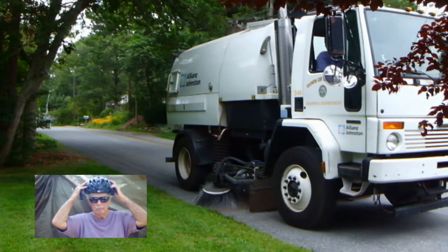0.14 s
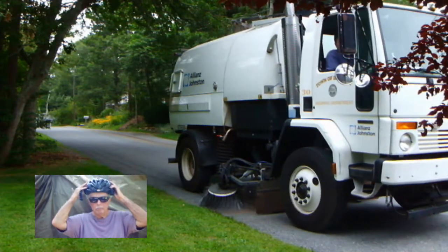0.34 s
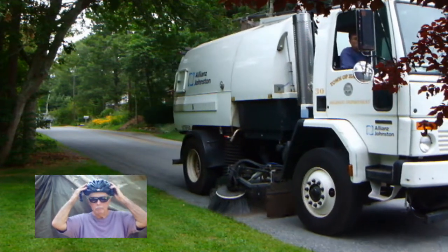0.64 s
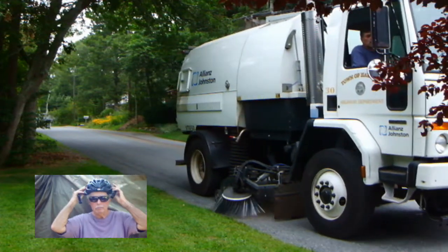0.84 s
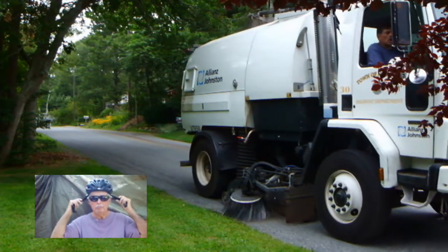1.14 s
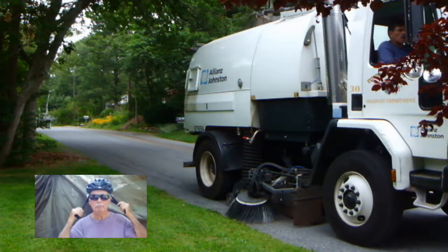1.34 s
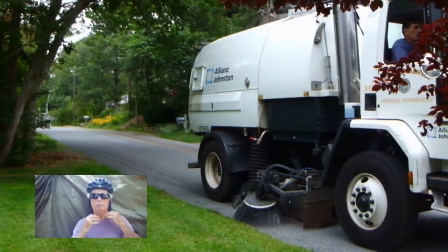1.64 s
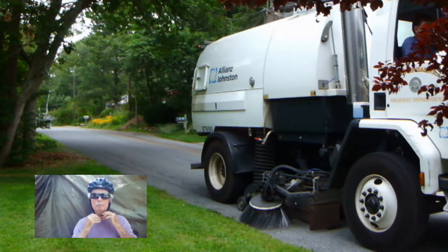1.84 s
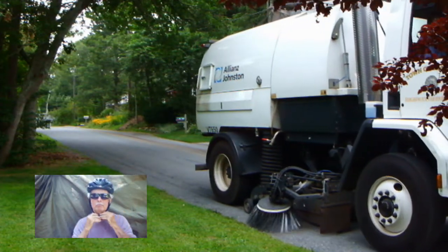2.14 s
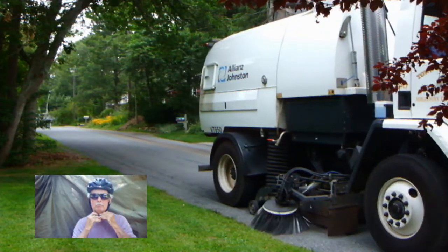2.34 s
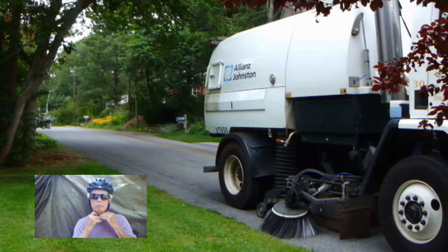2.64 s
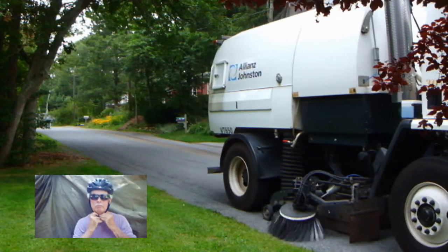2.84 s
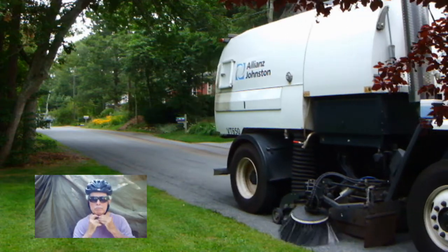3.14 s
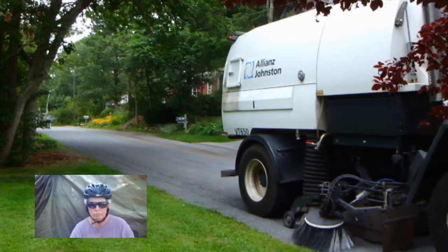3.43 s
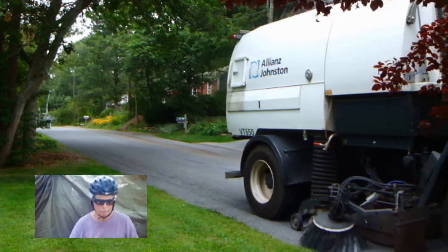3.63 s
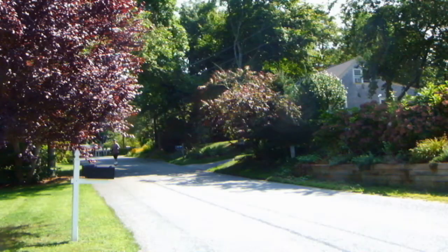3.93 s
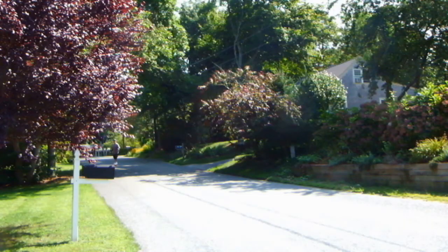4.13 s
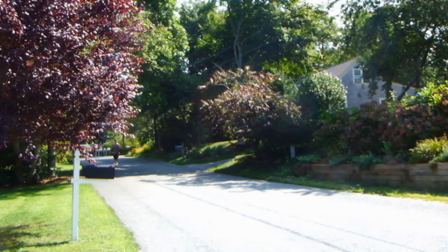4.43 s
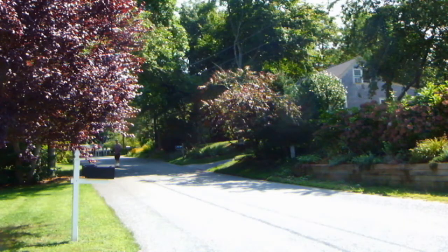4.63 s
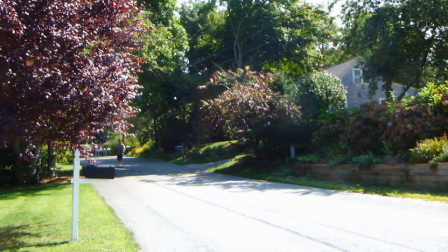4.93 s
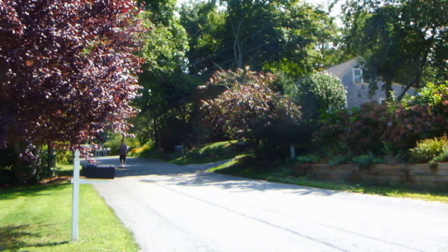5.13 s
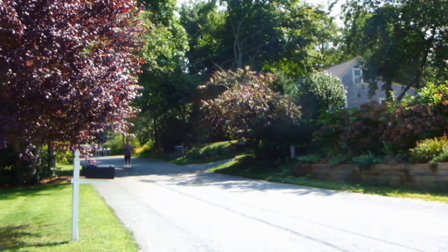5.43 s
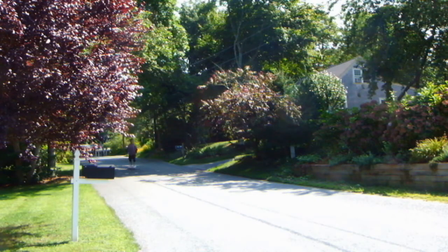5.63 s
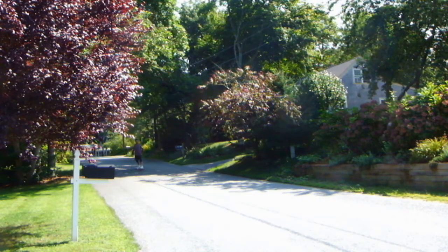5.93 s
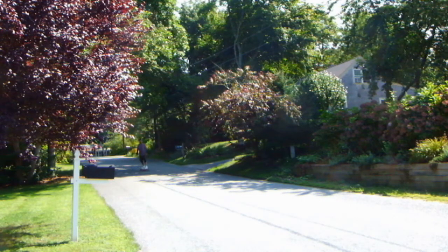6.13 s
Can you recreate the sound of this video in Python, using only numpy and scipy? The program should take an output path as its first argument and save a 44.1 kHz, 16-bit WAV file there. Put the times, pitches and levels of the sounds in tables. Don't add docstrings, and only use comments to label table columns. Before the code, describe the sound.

Outdoors in stereo, a heavy diesel sweeper hums and roars at moderate distance with brush hiss and a faint metallic brake squeal. One hard, close plastic buckle snap jumps out over it. The truck vanishes in an instant, leaving soft far-off air and hum, a brief thin bird call, then rapid insect clicking that swells and drops, with tiny gritty ticks and soft bumps.

```python
import sys
import numpy as np
from scipy import signal
from scipy.io import wavfile
from scipy.ndimage import uniform_filter1d

SR = 44100
rng = np.random.default_rng(int(sys.argv[2]) if len(sys.argv) > 2 else 0)


def decibels_to_gain(level_db):
    exponent = np.asarray(level_db, float) / 20
    return 10 ** exponent


def to_wav(s):
    ch = np.atleast_2d(s).T
    pcm = np.round(np.clip(ch, -1, 1) * 32767)
    wavfile.write(sys.argv[1], SR, pcm.astype(np.int16))


N = 276491
CUT_S = 3.7185


def clock():
    return np.arange(N) / SR


def hump(at_s, width_s):
    return np.exp(-((clock() - at_s) / width_s) ** 2)


def spell(start_s, length_s, edge_s):
    inside_s = np.minimum(clock() - start_s, start_s + length_s - clock())
    return np.clip(inside_s / edge_s, 0, 1)


def evened(x):
    return x / np.sqrt(np.mean(x ** 2) + 1e-20)


def read(points, hz):
    f, value = np.transpose(points)
    return np.interp(np.log(hz + 1), np.log(f + 1), value)


def columns(rows):
    s, *values = np.transpose(rows)
    return [np.interp(clock(), s, v) for v in values]


def add(mix, start_s, sound):
    part = mix[round(start_s * SR):][:len(sound)]
    part += sound[:len(part)]


def tone(hz, width_hz, clean=.5):
    r = np.exp(-np.pi * width_hz / SR)
    noise = rng.standard_normal(len(hz)) + 1j * rng.standard_normal(len(hz))
    blur = signal.lfilter([(1 - r) ** 2], [1, -2 * r, r * r], noise)
    blur /= np.sqrt(np.mean(abs(blur) ** 2))
    clean = np.clip(clean, 0, 1)
    turn = np.exp(2j * np.pi * (np.cumsum(hz) / SR + rng.random()))
    return np.sqrt(2) * ((clean + np.sqrt(1 - clean ** 2) * blur) * turn).real


def hiss(shape, same, lean, lead, patchy_db, flicker_db, size=1024):
    frames, hz = N * 4 // size + 5, np.fft.rfftfreq(size, 1 / SR)
    a, b, c, d, patches = rng.standard_normal((frames, len(hz), 5)).T
    patches = uniform_filter1d(patches, size=size // 80, axis=0)
    patches = evened(uniform_filter1d(patches, size=14000 // size, axis=1))
    flicker = evened(uniform_filter1d(rng.standard_normal(frames), size=5000 // size))
    alike = np.clip(read(same, hz), -1, 1)[:, None]
    left = a + 1j * b
    shared = alike * left * np.exp(-1j * read(lead, hz))[:, None]
    right = shared + np.sqrt(1 - alike ** 2) * (c + 1j * d)
    level_db = read(shape, hz)[:, None] + patchy_db * patches + flicker_db * flicker
    z = np.array([left, right]) * decibels_to_gain(level_db)
    z *= decibels_to_gain(np.multiply.outer([.5, -.5], read(lean, hz)))[..., None]
    return signal.istft(z, nperseg=size, noverlap=size * 3 // 4)[1][:, :N]


def banded(x, lo_hz, hi_hz):
    band_pass = signal.butter(4, [lo_hz, hi_hz], "band", fs=SR, output="sos")
    return x / signal.sosfilt(band_pass, x.mean(0)).std()


def whistle(note, width_hz, clean, top=0.45, in_db=-8, out_db=-8):
    start_s, length_s, db, first_hz, last_hz = note
    u = np.arange(0, length_s, 1 / SR) / length_s
    swell_db = np.interp(u, [0, np.clip(top, .01, .99), 1], [in_db, 0, out_db])
    line = tone(first_hz + (last_hz - first_hz) * u, width_hz, clean)
    return start_s, decibels_to_gain(db + swell_db) * line * signal.windows.tukey(len(u), .15)


def ring(hz, db, t60, rise=.0001):
    t = np.arange(int(.03 * SR)) / SR
    return decibels_to_gain(db - 60 * t / t60) * (1 - np.exp(-t / rise)) * np.sin(2 * np.pi * hz * t)


def engine():
    # time_s, firing_rate_hz
    speed = [(0, 89.7), (.4, 90.7), (1.0, 92.0), (1.7, 92.6), (2.3, 96.5), (2.85, 96.1), (3.71, 97.5)]
    # time_s, level_db
    boom = [(0.0, -27.5), (0.04, -29), (1.47, -33.5), (1.86, -25.5), (1.95, -31.5), (2.33, -35.5),
            (2.51, -24.5), (2.7, -22.5), (3.12, -24), (3.43, -34.5), (3.49, -47), (3.65, -27),
            (3.71, -27.5)]
    eighths = [3, 4, 5, 6, 7, 9, 10, 11, 13, 17, 19, 21, 26]
    eighths_db = [-56, -56, -42, -47, -55.5, -46, -57, -44.5, -56.5, -51, -50.5, -63, -54.5]
    fan_hz = [40, 62.5, 80, 213.5, 427, 854]
    fan_db = [-42, -44, -51, -48, -52, -68]

    (hz,), (boom_db,) = columns(speed), columns(boom)
    far_db, near_db, abreast_s, turn_s = -53.5, -33, 1.84, 1.1
    pipe_db = far_db + (near_db - far_db) * (1 + np.tanh((clock() - abreast_s) / turn_s)) / 2
    panel_db = -51 + 8.5 * hump(1.85, .6)
    out = np.zeros(N)
    for k, db in enumerate((boom_db, pipe_db, panel_db), 1):
        out += decibels_to_gain(db + .6) * tone(k * hz, 5. * k, clean=1 - .002 * k ** 4)

    surge_period_s, surge_top_s = 1.6, 2.35
    below_db = 1.5 + 3 * np.cos(2 * np.pi * (clock() - surge_top_s) / surge_period_s)
    above_db = -6 + 9.5 * hump(1.55, 0.96)
    for k, db in zip(eighths, eighths_db):
        order_db = db + below_db * (k < 8) + above_db * (9 < k < 14)
        out += decibels_to_gain(order_db) * tone(k / 8 * hz, 1.5, clean=.9)

    blade_db = 5 * hump(.75, .5) - 1.5
    for f, db in zip(fan_hz, fan_db):
        out += decibels_to_gain(db + (f > 400) * blade_db) * tone(np.full(N, f), 1.5, clean=.85)
    return np.array([out * decibels_to_gain(-.8), np.roll(out, -3) * decibels_to_gain(.75)])


def sweeping():
    # pitch_hz, density_db (dB per Hz)
    roar_shape = [(15, -29), (28, -13), (40, 3.5), (100, 4), (155, -5), (220, 0), (290, 1), (400, -7.5),
                  (690, -8), (1000, -14), (1490, -24), (2500, -21), (3300, -29), (5500, -100)]
    # pitch_hz, density_db (dB per Hz)
    brush_shape = [(710, -22), (1200, -1.5), (1510, -7), (1650, -2.5), (2180, -4.5), (4360, -7.5),
                   (5470, -5.5), (9000, -9), (11700, -20.5), (19800, -120)]
    # pitch_hz, density_db (dB per Hz)
    tips_shape = [(4710, -26), (8000, -7.5), (13000, -2.5), (15100, -9), (15800, -6)]
    # pitch_hz, likeness (0 to 1)
    same = [(60, 0.81), (150, 0.96), (380, 0.96), (950, 0.92), (2380, 0.92), (5980, 0.24), (15000, 0.71)]
    # pitch_hz, left_over_right_db
    lean = [(60, -6), (180, -0.4), (550, -0.5), (1650, -0.5), (4970, 0.0), (15000, -0.5)]
    # pitch_hz, left_lead_rad
    lead = [(0, 0.27), (5000, -0.35), (6550, -0.088), (8440, -1.28), (11500, -1.1), (15500, -1.7)]

    roar = banded(hiss(roar_shape, same, lean, lead, patchy_db=0.56, flicker_db=-0.53, size=4096), 288, 1500)
    brush = banded(hiss(brush_shape, same, lean, lead, patchy_db=1.06, flicker_db=-0.26), 1900, 6880)
    tips = banded(hiss(tips_shape, same, lean, lead, patchy_db=1.2, flicker_db=0.9), 9100, 14000)
    out = decibels_to_gain(-41 + 0.72 * clock()) * roar
    out += decibels_to_gain(-43.5 - .5 * clock()) * brush
    out += decibels_to_gain(-47.5 - 1.57 * clock()) * tips
    return out


def brakes():
    # start_s, length_s, level_db, first_hz, last_hz
    squeals = [
        (1.18, .12, -50, 6310, 6295),
        (1.27, .49, -48, 6505, 6470),
        (1.03, .61, -50, 10250, 10130),
    ]
    out = np.zeros(N)
    for note in squeals[:2]:
        add(out, *whistle(note, 30, .96, top=.16, in_db=-2.5, out_db=-5.5))
    add(out, *whistle(squeals[2], 30, .96, top=.72, in_db=-11, out_db=-7))
    return out * decibels_to_gain([[.3], [-.3]])


def buckle():
    # time_s, peak_db, pitch_hz, contact_ms, tick_db
    snaps = [
        (2.90095, 2.5, 6300, .52, -18),
        (2.90157, -4, 5700, .62, -15),
        (2.90208, -16, 8300, .3, -5),
        (2.9027, -5, 6400, .36, -13),
        (2.90314, -2, 5950, .72, -20),
    ]
    out, tail = np.zeros(N), np.zeros((2, N))
    for s, db, hz, contact_ms, tick_db in snaps:
        t = np.arange(int(contact_ms * SR / 1000)) / SR
        add(out, s, decibels_to_gain(db) * np.sin(2 * np.pi * hz * t) * signal.windows.tukey(len(t), .6))
        knock = ring(2660, db - 9, .005, rise=.0003) + ring(3250, db - 14, .005, rise=.0003)
        knock += ring(8250, db - 19, .007) + ring(5050, db - 15.5, .014, rise=.0004)
        tick = ring(12000, tick_db, .0017, rise=.00002)
        add(out, s, knock + tick)

    echo_s, echo_db = .0044, -13
    out += decibels_to_gain(echo_db) * np.roll(uniform_filter1d(out, size=3), round(echo_s * SR))
    too_small_for_bass = signal.butter(3, 2300, "high", fs=SR, output="sos")
    out = signal.sosfilt(too_small_for_bass, out)

    t = np.arange(int(.25 * SR)) / SR
    for side in tail:
        ringing = tone(np.full(len(t), 5080), 380, clean=.2)
        ringing += decibels_to_gain(-2) * tone(np.full(len(t), 6000), 1500, clean=.1)
        add(side, 2.909, decibels_to_gain(-38.5 - 60 * t / .45) * ringing)
    early = .9 * out + .25 * np.gradient(out)
    return np.array([out, early]) + 0.57 * tail + .5 * tail[::-1]


def street():
    # pitch_hz, density_db (dB per Hz)
    air_shape = [(13, -36), (22, -16), (70, -2.5), (210, -5), (466, -12.5), (535, -12.5), (597, -13),
                 (1060, -17), (1950, -22.5), (2860, -24), (3380, -28), (5390, -29), (9340, -38),
                 (10700, -40.5), (15800, -48)]
    # pitch_hz, likeness (0 to 1)
    same = [(60, 0.81), (150, 0.9), (380, 0.81), (950, 0.76), (2380, 0.59), (5980, 0.15), (15000, 0.47)]
    # pitch_hz, left_over_right_db
    lean = [(60, -3.5), (180, -0.3), (550, -1.0), (1650, -1.0), (4970, -0.65), (15000, -1)]
    # pitch_hz, left_lead_rad
    lead = [(0, 0), (2840, 0.1), (8270, 0.6), (10900, 0.1), (15500, 0.1)]
    # start_s, length_s, lift_db
    hums = [
        (4.08, 1.51, 7.5),
        (5.74, 0.45, 9.5),
    ]
    # pitch_hz, level_db
    whines = [(1055, -71), (2116, -74), (10874, -79)]
    # start_s, length_s, level_db, first_hz, last_hz
    bumps = [
        (5.52, .22, -49.5, 142, 140),
        (5.93, .1, -50, 360, 360),
        (5.95, .07, -49, 650, 625),
    ]

    air = banded(hiss(air_shape, same, lean, lead, patchy_db=0.54, flicker_db=0.0, size=2048), 110, 1500)
    hum_db = -57
    for start_s, length_s, lift_db in hums:
        hum_db = hum_db + lift_db * spell(start_s, length_s, edge_s=0.04)
    near = decibels_to_gain(hum_db) * tone(np.full(N, 62.), 14., clean=.8)
    for hz, db in whines:
        near += decibels_to_gain(db) * tone(np.full(N, hz), 3., clean=.99)
    for note in bumps:
        add(near, *whistle(note, note[3] / 6, .5))
    air_db = -48.5 + 0.75 * (clock() - CUT_S)
    return decibels_to_gain(air_db) * air + near * decibels_to_gain([[-.7], [.7]])


def birds():
    # start_s, length_s, level_db, first_hz, last_hz
    notes = [
        (4.37, .085, -65, 8520, 8380),
        (4.425, .15, -59.5, 8220, 8290),
        (4.585, .11, -59, 8020, 8420),
        (4.645, .19, -58, 8460, 8310),
        (4.36, .08, -66, 7850, 8000),
        (4.66, .12, -67, 8100, 7950),
    ]
    # start_s, length_s, level_db, first_hz, last_hz
    chirp = (4.33, .026, -61, 6340, 6370)
    # start_s, length_s, level_db, first_hz, last_hz
    rustle = (4.14, .13, -65.5, 9350, 9600)
    out = np.zeros((2, N))
    for side in out:
        for note in notes:
            add(side, *whistle(note, 230, .55, top=.3, in_db=-7, out_db=-8))
        add(side, *whistle(chirp, 80, .9, top=.55, in_db=-4, out_db=-4))
        add(side, *whistle(rustle, 1300, .1, top=.25, in_db=-9, out_db=-6))
    return out


def insect():
    start_s, top_s, end_s, edge_s = 5.02, 5.8, 6.06, .07
    sizes = decibels_to_gain(3.2 * np.minimum(rng.exponential(1, N), 4))
    clicks_per_s = 1800
    clicks = rng.standard_normal((2, N)) * (rng.random(N) < clicks_per_s / SR) * sizes
    drum = ring(5250, 0, .0032, rise=.0003) + ring(6300, -2.5, .0022, rise=.0002)
    drum += ring(7600, -9, .0015, rise=.0001) + ring(2600, -9, .003, rise=.0003)
    level_db = -57 - 15 * np.maximum(top_s - clock(), 0) - 7 * spell(end_s, 9, edge_s)
    throb = evened(uniform_filter1d(rng.standard_normal(N), size=500))
    level = decibels_to_gain(level_db + 2.5 * throb) * spell(start_s, 9, edge_s)
    both_sides = clicks + 0.27 * clicks[::-1]
    return level * evened(signal.oaconvolve(both_sides, drum[None])[:, :N])


def grit():
    # time_s, peak_db, pitch_hz, treble_db
    ticks = [(5.0389, -51, 1690, -60), (5.1726, -46, 2050, -59), (5.2444, -45.5, 3050, -56),
             (5.2814, -44, 1910, -54), (5.2979, -40, 3140, -51), (5.3034, -44, 3150, -59),
             (5.6331, -42, 2510, -54), (5.6404, -47, 1790, -57), (5.6665, -37.5, 2260, -55),
             (5.6794, -44, 2420, -51), (5.6834, -46, 1910, -37), (5.7443, -39.5, 2360, -39),
             (5.8284, -52, 2140, -53), (5.8865, -39.5, 2180, -50), (5.9179, -45, 2120, -57),
             (5.9743, -40.5, 2477, -45), (5.9894, -47, 2470, -41), (6.0394, -54, 2400, -44),
             (6.1294, -56, 1850, -50), (6.1844, -47, 1540, -57)]
    out, t = np.zeros(N), np.arange(int(.03 * SR)) / SR
    for s, db, hz, treble_db in ticks:
        tick = ring(hz, db + 7.5, .0065, rise=.0003) + ring(5500, treble_db + 5, .0022, rise=.00005)
        scatter = decibels_to_gain(db - 8 - 60 * t / .05) * tone(np.full(len(t), hz), 1800, clean=.1)
        add(out, s, tick + scatter)
    return out


def scene():
    before = np.clip((CUT_S - clock()) / .0005, 0, 1)
    truck = engine() + sweeping() + brakes() + buckle()
    quiet = street() + birds() + insect() + grit()
    return before * truck + (1 - before) * quiet


def top_cut(x):
    return signal.sosfilt(signal.butter(12, 15900, fs=SR, output="sos"), x)


def record(dry):
    bass_cut = signal.butter(2, 18, "high", fs=SR, output="sos")
    ceiling = np.clip(signal.sosfilt(bass_cut, dry), -1, 1)
    band_limit = signal.firwin(151, 16050, fs=SR)
    return top_cut(signal.oaconvolve(ceiling, band_limit[None], "same"))


dry = scene()
out = record(dry)
to_wav(out)
```